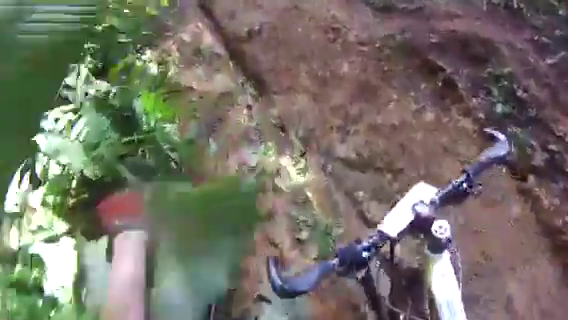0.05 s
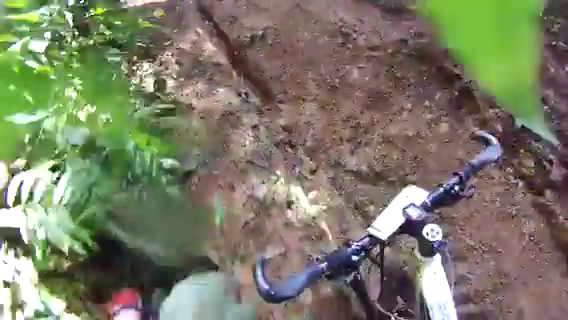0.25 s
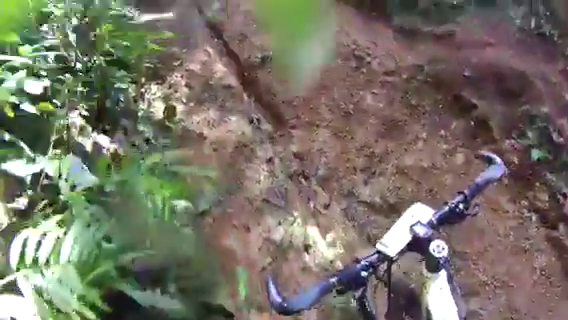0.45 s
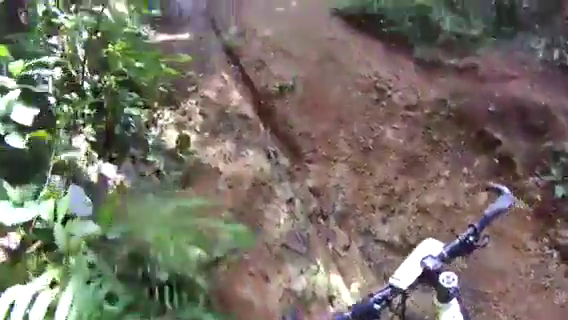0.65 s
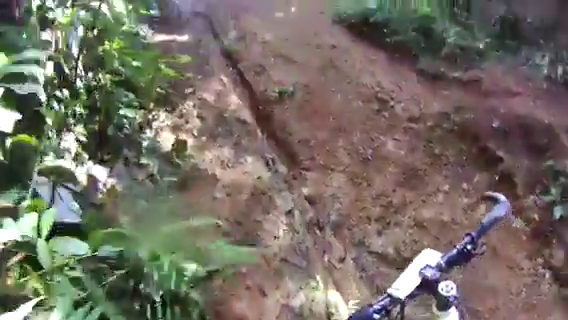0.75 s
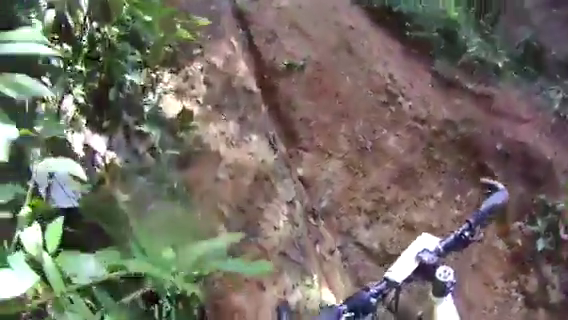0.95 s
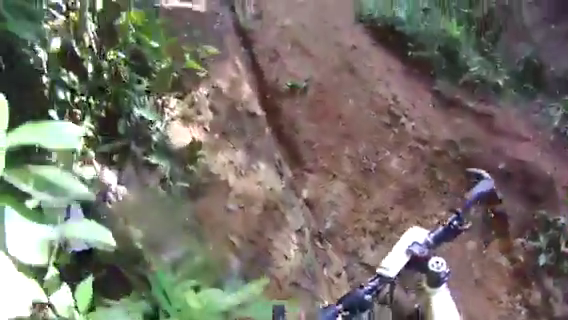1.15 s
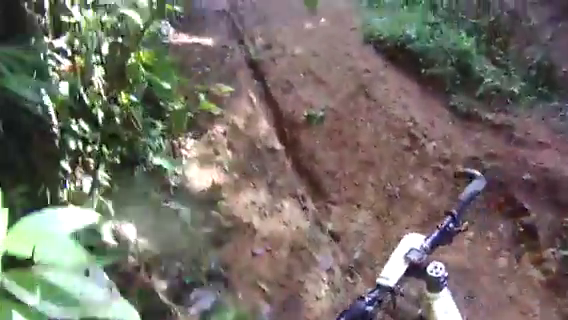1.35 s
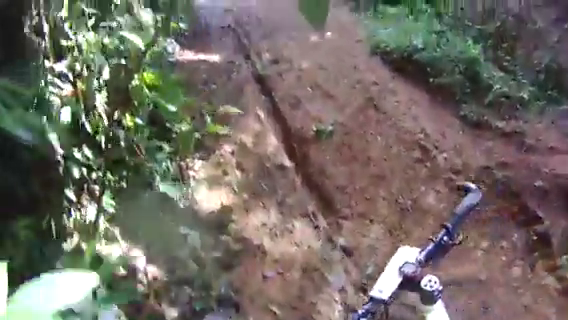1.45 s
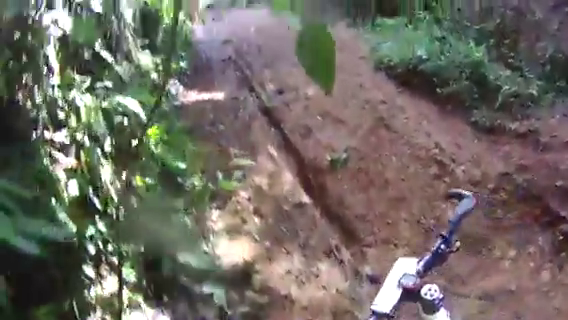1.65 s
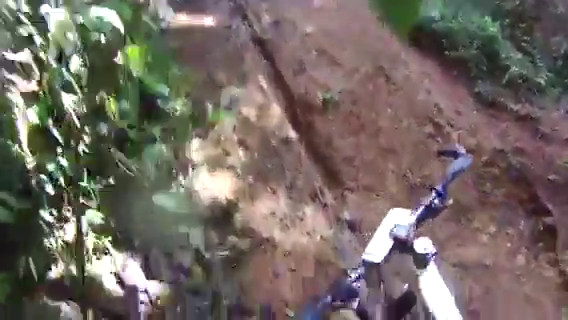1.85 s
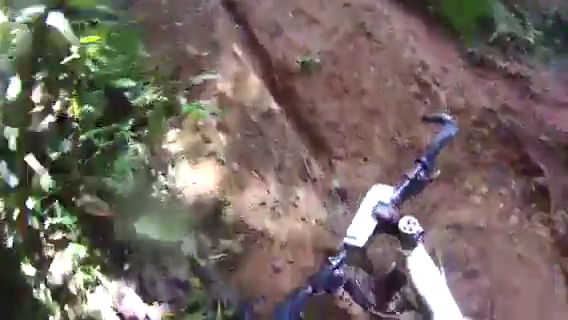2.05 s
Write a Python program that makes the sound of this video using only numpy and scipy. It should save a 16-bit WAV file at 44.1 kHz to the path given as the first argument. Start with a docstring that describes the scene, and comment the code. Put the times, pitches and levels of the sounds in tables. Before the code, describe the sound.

A leaf slaps the microphone at about 0.25 seconds and drags across it with a papery, crackling rasp, fading into a hiss by 0.6. Short dull knocks from stems and the camera mount follow near 0.7, 1.15, 1.25 and 1.8 seconds. Faint rustles and tiny dry ticks fall between them. Everything is very close, over quiet outdoor air on a trail.

```python
"""A dirt trail, close to dense bushes, heard from the microphone of a camera on a bicycle eased along.
Right at the microphone a leaf slaps the housing and drags across it, first catching and slipping,
then sliding off with a hiss. Stems knock on the housing and the mount thumps softly with the movement.
Small rustles and ticks stand out of the quiet outdoor air. The image is all but mono."""
import sys
import numpy as np
from scipy import signal
from scipy.fft import rfft, irfft
from scipy.io import wavfile
from scipy.ndimage import map_coordinates

SR = 44100
rng = np.random.default_rng(int(sys.argv[2]) if len(sys.argv) > 2 else 0)


def unload_audio(sound):
    """Save the sound as a 16-bit wav file, at the path given as the first command line argument."""
    columns = np.transpose(np.atleast_2d(sound))
    # keep every value between -1 and 1, then stretch to whole-number steps
    steps = np.round(np.clip(columns, -1, 1) * 32767)
    wavfile.write(sys.argv[1], SR, steps.astype(np.int16))


N = 92610
T = np.arange(N) / SR
SLIPS_PER_S, SLIP_SPREAD_DB = 3000, 3.5  # stick-slip friction

# resonances of the camera housing: (frequency [Hz], width [Hz], gain [dB])
HOUSING = [(180, 25, 0), (275, 106, 1), (510, 108, -5.5), (678, 88, 0.5), (792, 79, -1), (999, 97, -3),
           (1173, 56, -7.5), (1630, 30, -17), (2140, 59, -11.5), (2893, 134, -7.5), (4250, 510, -10),
           (5550, 380, -10.5), (6840, 120, -14.5), (14300, 280, -33)]


def from_db(db):
    """Decibels to gain."""
    return 10 ** (np.asarray(db) / 20)


def rms_one(x):
    """Scale to an rms of 1."""
    return x / np.sqrt(np.mean(x ** 2) + 1e-20)


def level(rows):
    """Gain over time from (time [s], level [dB]) points."""
    return from_db(np.interp(T, *np.transpose(rows)))


def coloured(x, spectrum):
    """Shape x by (frequency [Hz], gain [dB]) points, then scale to an rms of 1."""
    hz, db = np.transpose(spectrum)
    log_hz = np.log(np.arange(N // 2 + 1) * SR / N + 1)
    gain = from_db(np.interp(log_hz, np.log(hz), db))
    return rms_one(irfft(rfft(x) * gain, N))


def low_pass(x, hz, order=2):
    """Butterworth low-pass."""
    return signal.sosfilt(signal.butter(order, hz, fs=SR, output="sos"), x + 1e-18)


def band_pass(x, low_hz, high_hz):
    """Butterworth band-pass."""
    return signal.sosfilt(signal.butter(3, [low_hz, high_hz], "band", fs=SR, output="sos"), x)


def low_cut(x, hz=126):
    """The small housing carries little deep bass."""
    return signal.sosfilt(signal.butter(2, hz, "high", fs=SR, output="sos"), x)


def resonate(x, modes):
    """Parallel resonances: (frequency [Hz], width [Hz], gain [dB])."""
    out = 0
    for hz, width, db in modes:
        r = np.exp(-np.pi * width / SR)
        poles = [1, -2 * r * np.cos(2 * np.pi * hz / SR), r * r]
        out = out + from_db(db) * (1 - r * r) / 2 * signal.lfilter([1, 0, -1], poles, x + 1e-18)
    return out


def smear(x, hz=2700, width_hz=2700):
    """Bending waves smear a crack: an all-pass that delays it by a fraction of a millisecond."""
    r = np.exp(-np.pi * width_hz / SR)
    poles = [1, -2 * r * np.cos(2 * np.pi * hz / SR), r * r]
    return signal.lfilter(poles[::-1], poles, x)


def flutter(rate_hz, depth_db):
    """A randomly wavering gain."""
    return from_db(depth_db * rms_one(low_pass(rng.standard_normal(N), rate_hz)))


def grains(per_s, spread_db):
    """Random clicks of uneven size and sign."""
    sizes = from_db(spread_db * np.minimum(rng.exponential(1, N), 4))
    signs = rng.choice([-1, 1], N)
    return sizes * signs * (rng.random(N) < per_s / SR)


def click(s):
    """A unit impulse at time s."""
    return (np.arange(N) == int(s * SR)) * 1.0


def dying(s, decay_s):
    """An exponential decay that starts at time s."""
    return (T >= s) * np.exp(-np.clip((T - s) / decay_s, 0, 40))


def crunch(s, decay_s):
    """A short burst of tiny fractures, of unit energy."""
    burst = rng.standard_normal(N) * dying(s, decay_s)
    return burst / np.linalg.norm(burst)


def background():
    """Quiet outdoor air, the handling rumble of the moving camera and its microphone's steady hiss."""
    # spectra of the three noises: (frequency [Hz], relative level [dB])
    air_colour = [(25, -6.5), (80, -45), (160, -12.5), (450, 3), (1500, 6), (2100, -3.5), (2800, -14.5),
                  (3600, -20.5), (15000, -27.5)]
    rumble_colour = [(20, -8), (80, -10.5), (170, -4), (350, -12), (1000, -68)]
    hiss_colour = [(7000, -0.5), (15000, -5)]
    # rise and fall of the air and the rumble: (time [s], level [dB])
    air_level = [(0, -66.5), (.1, -62), (.7, -58), (.9, -70), (1.55, -68.5), (1.72, -69.5), (2.02, -66),
                 (2.1, -71)]
    rumble_level = [(0, -81.5), (.19, -74.5), (.26, -68), (.38, -78.5), (.9, -88.5), (1.08, -107),
                    (1.15, -72.5), (1.42, -72.5), (1.6, -87.5), (1.95, -73.5), (2.02, -96)]
    air = level(air_level) * coloured(rng.standard_normal(N), air_colour)
    rumble = level(rumble_level) * coloured(rng.standard_normal(N), rumble_colour)
    hiss = from_db(-79.5) * coloured(rng.standard_normal(N), hiss_colour)
    return air + rumble + hiss


def brushes():
    """Clothes and leaves brush nearby in short, dull strokes of grainy friction."""
    # soft strokes: (time [s], length [s]: full level for its first half, then fading out until its end plus the
    # release, level [dB], lower band edge [Hz])
    strokes = [(0.093, 0.011, -54, 510), (0.154, 0.0036, -49.5, 413), (0.169, 0.071, -64, 290),
               (0.672, 0.0087, -53.5, 407), (0.966, 0.027, -68.5, 1540), (1.221, 0.029, -60.5, 142),
               (1.228, .025, -66.5, 1740), (1.37, 0.0074, -69, 1480), (1.773, 0.0067, -67, 2000),
               (1.833, 0.027, -65.5, 119), (1.863, 0.01, -51, 165), (1.881, 0.0088, -51.5, 457)]
    attack_s, release_s, width_hz = 0.00053, 0.011, 1030
    friction = grains(per_s=2200, spread_db=3.5)
    out = 0
    for s, length, db, low_hz in strokes:
        envelope = np.interp(T - s - attack_s, [-attack_s, 0, length / 2, length + release_s], [0, 1, 1, 0])
        rub = rms_one(band_pass(friction, low_hz, low_hz + width_hz))
        out = out + from_db(db) * envelope * rub
    return out


def ticks():
    """Tiny dry ticks: bright noise that dies within milliseconds."""
    # onsets of the ticks: (time [s], level [dB])
    onsets = [(0.2124, -55), (0.735, -56.5), (0.764, -55.5), (1.138, -61.5), (1.585, -61), (1.933, -61.5),
              (1.96, -65.5)]
    # their spectrum: (frequency [Hz], relative level [dB])
    colour = [(1000, -56), (3500, -29), (6400, -15.5), (10000, -30), (15000, -50)]
    envelope = sum(from_db(db) * dying(s, decay_s=0.0031) for s, db in onsets)
    return envelope * coloured(rng.standard_normal(N), colour)


def mount_thumps():
    """A dull click in the housing, then the loose mount swings for a few cycles, grating as it moves."""
    # jolts of the mount: (time [s], swing level [dB], frequency [Hz], t60 [s], contact click [dB])
    jolts = [(0.184, -46.5, 232, 0.05, -44), (0.7168, -34, 180, 0.077, -9.5), (0.796, -50, 180, 0.061, -37),
             (.852, -43, 234, 0.017, -23), (1.148, -40, 242, 0.073, -9), (1.2522, -33.5, 210, 0.026, -20.5),
             (1.416, -48.5, 174, 0.05, -41), (1.525, -42.5, 191, 0.07, -29),
             (1.789, -40.5, 164, 0.052, -15), (1.8009, -40, 177.4, 0.071, -26)]
    attack_s = 0.0031
    swings, clicks = 0, 0
    for s, db, hz, t60, click_db in jolts:
        envelope = dying(s, t60 / np.log(1000)) * (1 - dying(s, attack_s))
        swings = swings + from_db(db) * envelope * np.sin(2 * np.pi * hz * (T - s))
        clicks = clicks + from_db(click_db) * click(s)
    friction = rms_one(low_pass(grains(SLIPS_PER_S, SLIP_SPREAD_DB), hz=610))
    grit = from_db(-13) * swings * friction
    return low_cut(swings + grit) + low_pass(resonate(clicks, HOUSING), hz=1780)


def stem_knocks():
    """A click and a brief crunch ring the housing; the contact's place and softness set the colour."""
    # stems striking: (time [s], force [dB], bass [dB], treble [dB], cut-off [Hz], damping [ratio])
    strikes = [(0.234, -13, 1, 15, 15000, 1.4), (0.2448, -1, 0, 10.5, 11100, 0.82),
               (0.2509, 13.5, -17, -18, 10900, 1.14), (0.7166, -1.5, -9, -6, 1850, 0.94),
               (1.1377, 8, 5, -3.5, 2000, 0.99), (1.1413, -0.5, 10, -9, 870, 0.53),
               (1.7452, 1.5, -17, -2.5, 6400, 1.69)]
    bass_hz, treble_hz = 352, 2000
    hollow_hz, hollow_width_hz = 1470, 243
    out = 0
    for s, db, bass_db, treble_db, contact_hz, damping in strikes:
        modes = []
        for hz, width, mode_db in HOUSING:
            tilt_db = bass_db / (1 + (hz / bass_hz) ** 4) + treble_db / (1 + (treble_hz / hz) ** 2)
            modes.append((hz, width * damping, mode_db + tilt_db))
        crack = band_pass(crunch(s, decay_s=0.001), low_hz=2040, high_hz=15000)
        force = click(s) + from_db(-10) * crack
        ring = resonate(smear(force), modes)
        out = out - from_db(db) * low_pass(ring, contact_hz, order=4)
    # a dip between the housing's resonances makes it sound hollow
    notch = signal.iirnotch(hollow_hz, hollow_hz / hollow_width_hz, fs=SR)
    return low_cut(signal.lfilter(*notch, out))


def leaf_scrapes():
    """A fold of the leaf rubs briefly in one narrow resonance."""
    # folds passing over the housing: (time [s], length [s], level [dB], frequency [Hz])
    folds = [(0.253, 0.014, -39.5, 595), (0.303, 0.04, -53.5, 393), (0.435, 0.017, -52.5, 700),
             (0.564, 0.058, -56, 880), (0.574, 0.02, -53.5, 680), (0.592, 0.018, -61, 3550)]
    width_hz = 117
    out = 0
    for s, length, db, hz in folds:
        arch = np.sqrt(np.clip(1 - (2 * (T - s) / length - 1) ** 2, 0, 1))
        rub = arch * resonate(grains(SLIPS_PER_S, SLIP_SPREAD_DB), [(hz, width_hz, 0)])
        out = out + from_db(db) * rub * np.sqrt(length * SR) / np.linalg.norm(rub)
    return out


def leaf_snags():
    """Each catch ends in a papery crackle with a pitch of its own."""
    # the leaf catches and lets go: (time [s], level before the low-pass [dB], frequency [Hz])
    catches = [(0.2653, -35, 2000), (0.279, -33.5, 3400), (0.294, -39.5, 1560), (.3065, -33.5, 1550),
               (0.3799, -38, 2770), (.395, -37.5, 1870), (0.4172, -34.5, 1800), (0.4274, -35, 1610),
               (.483, -44.5, 1460), (0.5081, -45, 1730), (0.529, -46.5, 740)]
    decay_s, q = 0.0036, 2.5
    out = 0
    for s, db, hz in catches:
        crackle = resonate(crunch(s, decay_s), [(hz, hz / q, 0)])
        out = out + from_db(db) * crackle * np.sqrt(decay_s * SR) / np.linalg.norm(crackle)
    return low_pass(out, hz=3800, order=3)


def sliding_leaf():
    """Fine friction grains hiss with shifting colour; the leaf's edge adds a sizzle, its flat a swish."""
    # course of the three sounds as the leaf passes the microphone: (time [s], level [dB])
    hiss_level = [(.229, -100), (.234, -53), (.258, -45), (.286, -39), (.302, -46.5), (.33, -44.5),
                  (.348, -49.5), (.368, -45), (.404, -51), (.43, -47), (.455, -51), (.575, -52.5),
                  (.63, -67), (.666, -62), (.685, -79.5), (.73, -65.5), (.8, -104)]
    sizzle_level = [(.229, -101), (.234, -53), (.28, -46.5), (.305, -60), (.365, -54.5), (.405, -70),
                    (.425, -50), (.45, -82), (.53, -62), (.6, -63), (.64, -100)]
    swish_level = [(.42, -85), (.438, -50), (.49, -53.5), (.56, -75), (.62, -92)]
    # spectra of the friction: (frequency [Hz], relative level [dB])
    hiss_colour = [(150, -10.5), (400, -8), (1500, -7.5), (4000, -6.5), (5600, 1), (6800, -0.5),
                   (8100, -13.5), (10000, -16.5), (15000, -38)]
    sizzle_colour = [(4000, -34), (7800, 0.5), (8900, 0.5), (10300, -1), (12500, -8.5), (15000, -14)]
    grains_per_s, spread_db = 14000, 5
    edges_hz = np.geomspace(140, 16000, 16)
    friction = 0
    for low_hz, high_hz in zip(edges_hz, edges_hz[1:]):
        band = band_pass(grains(grains_per_s, spread_db), low_hz, high_hz)
        friction = friction + band * flutter(rate_hz=53, depth_db=3)
    hiss = coloured(friction, hiss_colour)
    sizzle = coloured(grains(per_s=7000, spread_db=7), sizzle_colour)
    swish = rms_one(band_pass(grains(grains_per_s, spread_db), low_hz=5180, high_hz=6800))
    return level(hiss_level) * hiss + level(sizzle_level) * sizzle + level(swish_level) * swish


def dragging_leaf():
    """Stick-slip clicks rasp in the leaf's resonances, which sink as it bends and spring back."""
    # pressure of the leaf, heard as the strength of its rasp: (time [s], level [dB])
    pressure = [(.228, -91), (.235, -38.5), (.296, -51), (.302, -51), (.309, -43), (.32, -38.5),
                (.334, -32.5), (.348, -40.5), (.364, -37.5), (.394, -50), (.43, -41.5), (.447, -50.5),
                (.47, -62), (.6, -62), (.86, -79)]
    # resonances of the unbent leaf: (frequency [Hz], width [Hz], gain [dB])
    leaf_modes = [(1166, 140, -3), (1460, 230, -0.5), (1715, 160, 3), (1993, 140, -8), (2800, 200, -15)]
    # their shift as it bends: (time [s], pitch [ratio])
    bend = [(.345, 1), (.365, .96), (.388, .75), (.396, 1.04)]
    slips = rms_one(resonate(grains(SLIPS_PER_S, SLIP_SPREAD_DB), leaf_modes))
    read_position = np.cumsum(np.interp(T, *np.transpose(bend)))  # slower reading lowers the pitch
    rasp = map_coordinates(slips, [read_position], mode="wrap")
    return level(pressure) * band_pass(rasp, low_hz=800, high_hz=3400)


def scene():
    """Everything reaches both channels alike, apart from a trace of hiss."""
    leaf = dragging_leaf() + leaf_snags() + leaf_scrapes() + sliding_leaf()
    mid = leaf + stem_knocks() + mount_thumps() + brushes() + ticks() + background()
    side = from_db(-85.5) * rng.standard_normal(N)
    return np.array([mid + side, mid - side])


def record(dry):
    """The top treble is cut steeply."""
    cutoff_hz = 15400
    return signal.sosfilt(signal.ellip(10, .1, 70, cutoff_hz, fs=SR, output="sos"), dry)


dry = scene()
out = record(dry)
unload_audio(out)
```